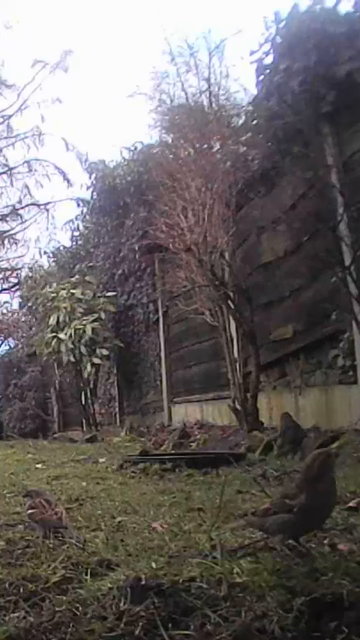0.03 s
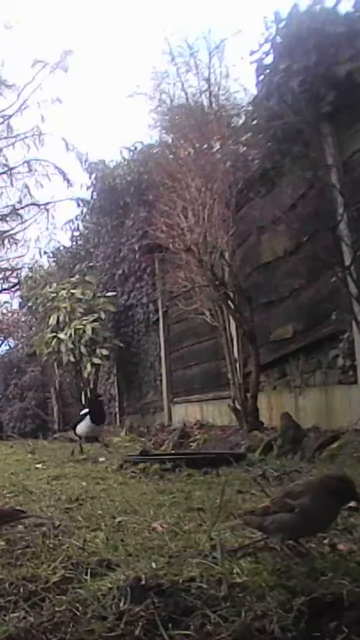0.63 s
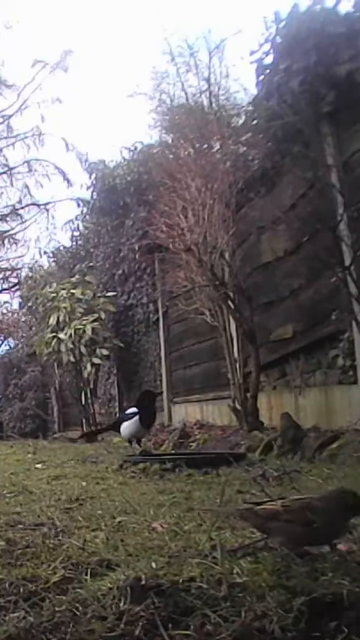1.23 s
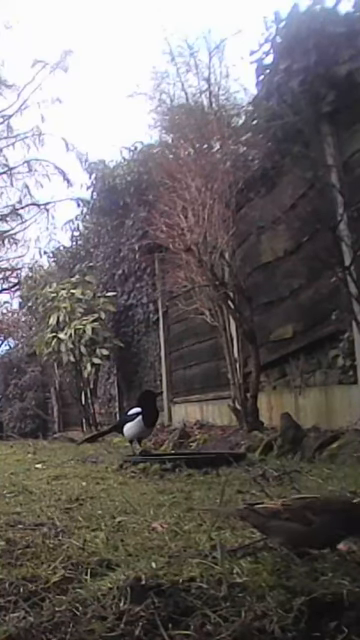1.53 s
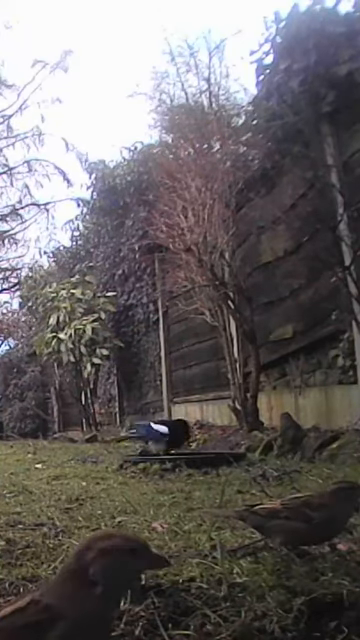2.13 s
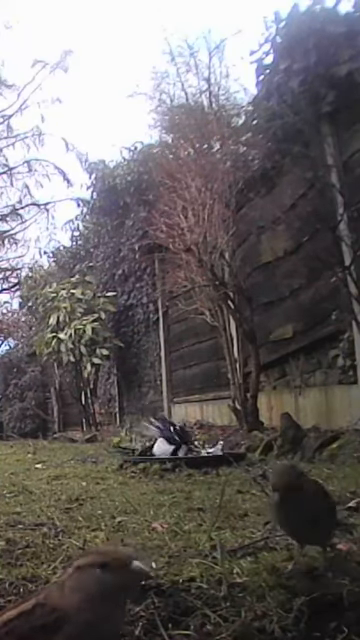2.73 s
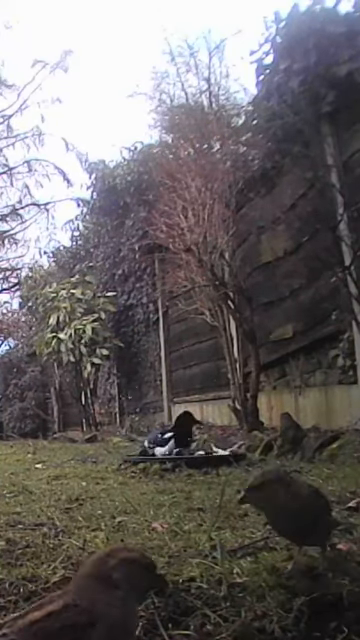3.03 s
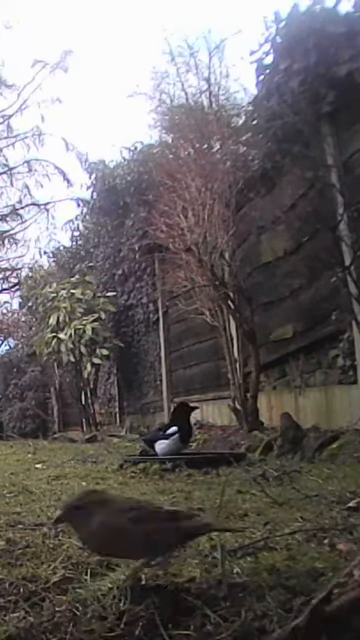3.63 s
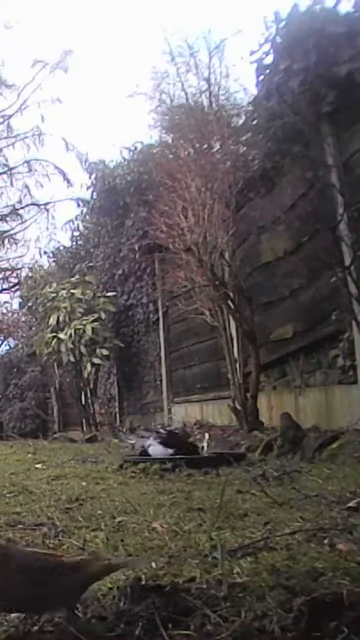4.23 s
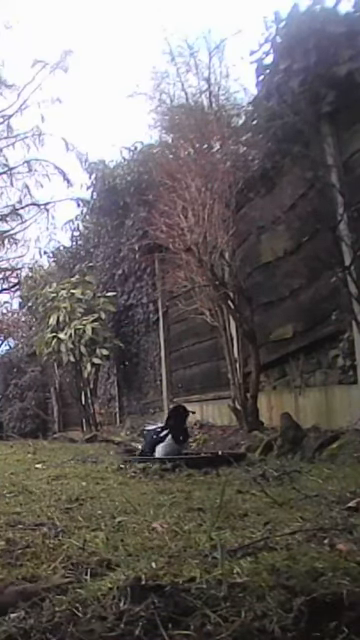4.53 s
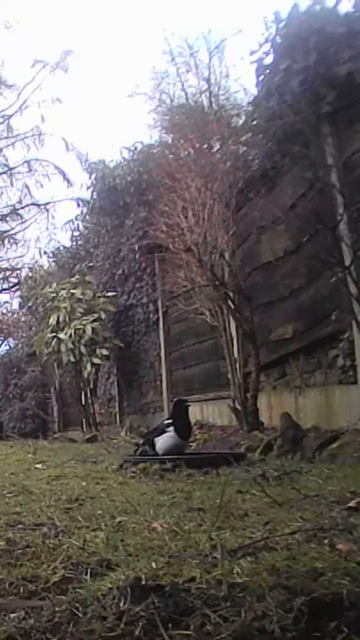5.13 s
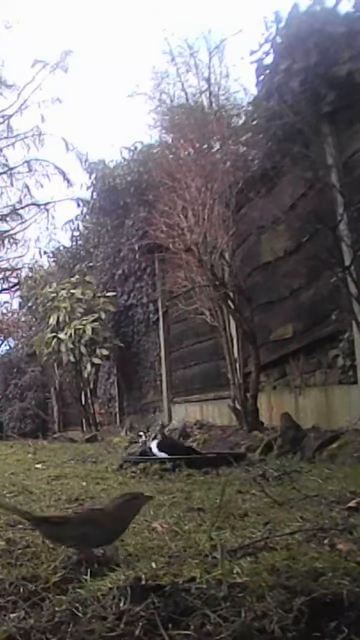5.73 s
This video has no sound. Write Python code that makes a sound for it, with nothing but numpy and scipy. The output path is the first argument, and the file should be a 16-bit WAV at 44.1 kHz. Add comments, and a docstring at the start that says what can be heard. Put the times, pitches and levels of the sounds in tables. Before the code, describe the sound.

A microphone low on a garden lawn picks up a deep, wavering drone of far traffic, along with its own hiss, slight whine and small clock-like tick. Everything else is faint: brief scratching from a sparrow in the grass, then light splashes and droplets as a magpie bathes further off. In the second half small birds give a falling whistle, a cluster of very high chirps and a raspy wheeze.

```python
"""Small birds give two thin high calls, a breathy falling whistle and a wheeze in a quiet garden.
Each call is a tone whose pitch shakes so fast that it buzzes. A sparrow scratches in the grass and
a magpie splashes in a dish: short puffs of noise, with tiny ringing drops among the splashes.
Behind them distant traffic rumbles and a far engine drones. The small camera on the lawn that hears
it all adds its own hiss, a faint whine and a tiny regular tick."""
import sys
import numpy as np
from scipy import signal
from scipy.fft import rfft, irfft
from scipy.io import wavfile

SR = 44100
rng = np.random.default_rng(int(sys.argv[2]) if len(sys.argv) > 2 else 0)


def unload_wav(signal):
    """Save mono or channel-first audio to the path in sys.argv[1] as 16-bit WAV at rate SR, clipped to [-1, 1]."""
    wavfile.write(
        sys.argv[1],
        SR,
        np.round(np.clip(np.atleast_2d(signal).T, -1, 1) * 32767).astype(np.int16),
    )


N = 254456

# puffs of noise; the last two blur the falling whistle, the others are water splashes:
# (time [s], level [dB], pitch [Hz], half length [s], pitch spread [natural log])
PUFFS = [(2.78, -74, 3400, .016, .2), (2.824, -73.5, 3570, .014, .06), (2.853, -77, 3600, .014, 0.073),
         (2.894, -72.5, 3600, .016, .2), (2.952, -69, 4000, .005, .35), (2.965, -65, 3700, 0.0075, 0.41),
         (2.992, -74, 2900, 0.0081, .25), (3.015, -73, 3700, 0.01, 0.3), (3.167, -75, 3120, .014, 0.28),
         (3.29, -79, 3500, 0.0071, .2), (4.22, -77, 3300, .1, 0.38), (4.415, -76, 3500, 0.03, 0.18)]


def amp(db):
    """Turns decibels into a number to multiply a sound by."""
    return 10 ** (np.asarray(db) / 20)


def unit(x):
    """Scales a signal so that its average size (rms) is 1."""
    return x / np.sqrt(np.mean(abs(x) ** 2) + 1e-30)


def curves(rows, t):
    """Joins a table's points with straight lines: one curve for each column after the time."""
    times, *columns = np.transpose(rows)
    return [np.interp(t, times, column) for column in columns]


def add(mix, start_s, sound):
    """Adds a sound to the mix at the given time."""
    part = mix[max(round(start_s * SR), 0):][:len(sound)]
    part += sound[:len(part)]


def noise(points):
    """Noise of average size 1, its tone shaped by points of (frequency [Hz], relative level [dB])."""
    hz, db = np.transpose(points)
    freqs = np.fft.rfftfreq(N, 1 / SR)
    shape = amp(np.interp(np.log(freqs + 1), np.log(hz + 1), db, left=-120, right=-120))
    return unit(irfft(rfft(rng.standard_normal(N)) * shape, N))


def drift(rate_hz):
    """A smooth random wobble of average size 1, no faster than about rate_hz."""
    freqs = np.fft.rfftfreq(2 ** 18, 1 / SR)
    spectrum = rfft(rng.standard_normal(2 ** 18))
    return unit(irfft(spectrum * np.exp(-(freqs / rate_hz) ** 2))[:N])


def puffs(rows):
    """Short, soft puffs of noise, each around one pitch."""
    out = np.zeros(N)
    for middle_s, db, hz, half_length_s, spread in rows:
        n = int(2 * half_length_s * SR)
        freqs = np.fft.rfftfreq(n, 1 / SR)
        band = np.exp(-.5 * (np.log((freqs + 1) / hz) / spread) ** 2)
        rustle = unit(irfft(rfft(rng.standard_normal(n)) * band, n))
        add(out, middle_s - half_length_s, amp(db) * rustle * np.hanning(n))
    return out


def camera(t, hiss_db=-71.5, tick_hz=5550, tick_rise_s=.0012):
    """The camera's own sounds: microphone hiss, a thin electrical whine and a small ringing tick."""
    # tone of the hiss: (frequency [Hz], relative level [dB])
    hiss_shape = [(880, -23.5), (1500, -2.5), (2010, -2), (2180, -2.5), (2240, -2.5), (3320, -3),
                  (3590, -3.5), (4610, -4), (5470, -4), (5920, -3.5), (6930, -5), (7770, -11),
                  (8290, -13.5), (10800, -47.5), (18200, -120)]
    # steady tones in the whine: (pitch [Hz], width [Hz], level [dB])
    whine_tones = [(582, 14.5, -80.5), (660, 22, -81.5), (702, 1, -76.3), (727, 8, -79.2), (751, 12, -84),
                   (1318, 45, -84), (1865, 31, -92), (2105, 1.2, -90.5), (2131, 2, -91.5), (2832, 1, -93.5),
                   (3298, 3, -95), (3465, 16, -92), (3510, 2, -93.5), (3535, 1.5, -92), (3656, 3, -95),
                   (5078, 35, -89), (5337, 28, -85.3), (5615, 31, -86.5), (5641, 2.5, -87)]
    # ticks, almost as regular as a clock: (time [s], level [dB])
    ticks = [(.406, -65), (1.052, -62), (1.713, -63.5), (2.394, -64), (3.044, -62), (3.706, -62),
             (4.370, -66), (5.028, -64), (5.676, -65)]
    out = amp(hiss_db) * noise(hiss_shape)
    for hz, width_hz, db in whine_tones:
        # small random steps blur each tone over its width
        wander = np.cumsum(rng.standard_normal(N)) * np.sqrt(2 * np.pi * width_hz / SR)
        out += amp(db) * np.sqrt(2) * np.sin(2 * np.pi * hz * t + wander)
    age = t[:SR // 10]
    ring = age / tick_rise_s * np.exp(1 - age / tick_rise_s) * np.sin(2 * np.pi * tick_hz * age)
    for peak_s, db in ticks:
        add(out, peak_s - tick_rise_s, amp(db) * ring)
    return out


def traffic(t, deep_db=-45.5, swell_db=.48, flutter_db=1.06):
    """Many far vehicles make a low rumble and their tyres a dull roar, wavering in the air."""
    # tone of the rumble, the deepest rumble and the tyres: (frequency [Hz], relative level [dB])
    rumble_shape = [(40, -28), (56, -4), (65, -7.5), (72, -6), (82, -12), (92, -7), (104, -7.5), (130, -15),
                    (141, -13), (165, -20.5), (190, -22), (203, -22), (238, -22), (260, -27.5), (305, -29),
                    (345, -35.5), (420, -44), (600, -68)]
    deep_shape = [(4.7, -30.5), (8.0, -2), (23, -2), (34, -1), (65, -15.5), (84, -46.5), (140, -120)]
    roar_shape = [(220, -38.5), (380, -6.5), (523, -8), (571, -6.5), (620, -6), (716, -3.5), (786, -4),
                  (897, -7), (1130, -7.5), (1195, -11), (1260, -8), (1340, -7.5), (1470, -15), (1700, -21),
                  (2210, -47), (3740, -120)]
    # traffic comes and goes: (time [s], rumble level [dB], tyre roar level [dB])
    levels = [(0.15, -51, -69.5), (.7, -50, -70.5), (1.2, -52, -69.5), (1.8, -51, -69.5),
              (2.4, -50.5, -69.5), (3.4, -51.5, -69.5), (4.1, -52, -69), (4.7, -51.5, -69.5),
              (5.35, -52, -70.5), (5.65, -51, -70)]
    rumble_db, roar_db = curves(levels, t)
    rumble = noise(rumble_shape) * amp(rumble_db + swell_db * drift(3.2))
    roar = noise(roar_shape) * amp(roar_db + flutter_db * drift(21))
    return amp(deep_db) * noise(deep_shape) + rumble + roar


def drone(pitch_hz=51.4, db=-50, wander_hz=2.688, waver_db=3.5):
    """A weak, low hum in the traffic; its pitch wanders, so it throbs against the engine."""
    hz = pitch_hz + wander_hz * drift(2.38)
    loudness = amp(db + waver_db * np.tanh(drift(13)))
    return np.sqrt(2) * loudness * np.sin(2 * np.pi * np.cumsum(hz) / SR)


def engine(t, firing_hz=46.14, waver_db=4, half_waver_db=4.5, jitter_cycles=.0099, shudder=.25):
    """A far engine hums unevenly at its firing rate and at half of it; the rest is lost on the way."""
    # the hum swells and fades unevenly: (time [s], firing tone level [dB], half-rate tone level [dB])
    levels = [(0.05, -43, -51), (.75, -44.5, -47), (1.25, -50, -46), (1.7, -44, -48.5), (2.15, -39, -51),
              (2.8, -41.5, -44.5), (3.3, -42.5, -46), (3.7, -40, -37.5), (4.3, -40.5, -41),
              (5.0, -43.5, -46), (5.35, -38, -52), (5.6, -40.5, -46.5), (5.73, -54.5, -40.5)]
    firing_db, half_db = curves(levels, t)
    phase = 2 * np.pi * (firing_hz * t + jitter_cycles * drift(6.1))
    firing_loudness = amp(firing_db + waver_db * np.tanh(drift(16)))
    firing_tone = np.sin(phase) + shudder * drift(16) * np.cos(phase)
    half_loudness = amp(half_db + half_waver_db * np.tanh(drift(14)))
    return np.sqrt(2) * (firing_loudness * firing_tone + half_loudness * np.sin(phase / 2))


def sparrow_scratches(pitch_hz=2450, spread=.21):
    """A sparrow makes a few quick, dry scrapes in the grass."""
    # scrapes: (time [s], level [dB], half length [s])
    scrapes = [(2.182, -71.5, 0.015), (2.21, -75, .02), (2.243, -71, .018), (2.269, -73, .011),
               (2.319, -74, .018)]
    return puffs([(time_s, db, pitch_hz, half_s, spread) for time_s, db, half_s in scrapes])


def spray(t, drops_per_s=300, low_hz=2040, high_hz=5400, pitches=16, ring_cycles=6, size_db=3):
    """Fine drops patter back into the dish, each ringing for a few cycles at its own pitch."""
    # spray falls between the splashes: (time [s], level [dB])
    levels = [(2.55, -100), (2.72, -84), (2.86, -82), (3.0, -81.5), (3.2, -86), (3.45, -100)]
    out, age = np.zeros(N), t[:SR // 50]
    for hz in np.geomspace(low_hz, high_hz, pitches):
        landings = rng.random(N) < drops_per_s / pitches / SR
        sizes = amp(size_db * np.minimum(rng.exponential(1, N), 3))
        ring = np.sin(2 * np.pi * hz * age) * np.exp(-2 * hz * age / ring_cycles)
        out += signal.oaconvolve(landings * sizes, ring)[:N]  # one ring for each landing
    return unit(out) * amp(curves(levels, t)[0])


def magpie_splashes():
    """A magpie bathes at the far end of the lawn, its wings throwing up water."""
    return puffs(PUFFS[:-2])


def whistle_blur():
    """A soft, breathy blur around the small bird's falling whistle."""
    return puffs(PUFFS[-2:])


def garden_echo(sound, fade_s=.23, echo_db=3, echoes_per_s=2000):
    """Fence, wall and hedges scatter many small echoes, which fade by 60 dB in fade_s."""
    age = np.arange(SR // 2) / SR
    strengths = rng.standard_normal(len(age))
    arrivals = (rng.random(len(age)) < echoes_per_s / SR) * (age > .002)
    echoes = unit(strengths * arrivals * amp(-60 * age / fade_s)) / np.sqrt(len(age))
    tail = signal.fftconvolve(sound, echoes)[:N]
    return (sound + amp(echo_db) * tail) / np.hypot(1, amp(echo_db))  # keeps the overall level


def bird_wheeze(t, start_s=5.28, peak_s=5.615, peak_db=-68, fade_db_per_s=26):
    """A bird's raspy wheeze: the pitch swings widely and unevenly, lingering at both ends."""
    middle_hz, swing_hz, rasp_hz = 3495, 205, 75
    swings_per_s, flutter_db = 110, 2.5
    swing_rate = swings_per_s * (1 + .45 * drift(90))
    swing = np.sin(2 * np.pi * np.cumsum(swing_rate) / SR)
    pitch = middle_hz + swing_hz * swing + rasp_hz * drift(300)
    tone = np.sin(2 * np.pi * np.cumsum(pitch) / SR) * amp(flutter_db * drift(110))
    swell = np.clip((t - start_s) / (peak_s - start_s), 0, 1) ** .78
    return unit(tone) * swell * amp(peak_db - fade_db_per_s * np.maximum(t - peak_s, 0))


def bird_note(length_s, first_hz, last_hz, db, swing_hz, swings_per_s=200, flutter_db=2.5):
    """One sliding whistle that swells and fades; a fast, uneven swing in pitch makes it buzz."""
    rise_share, fall_share = .24, .61  # parts of the note's length
    n = int(length_s * SR)
    progress = np.linspace(0, 1, n)
    slide_hz = first_hz + (last_hz - first_hz) * progress ** .84  # moves fastest at the start
    swing_rate = swings_per_s * (1 + .35 * drift(110)[:n])
    swing = np.sin(2 * np.pi * np.cumsum(swing_rate) / SR)
    wavering_hz = slide_hz * (1 + .0033 * drift(220)[:n])
    pitch = wavering_hz + swing_hz * (swing + .41 * drift(88)[:n])
    tone = np.sin(2 * np.pi * np.cumsum(pitch) / SR) * amp(flutter_db * drift(90)[:n])
    swell = np.clip(np.minimum(progress / rise_share, (1 - progress) / fall_share), 0, 1)
    return amp(db) * unit(tone) * swell


def small_birds(t):
    """Small birds whistle their short notes, and a wheeze comes last."""
    # notes: (start [s], length [s], first pitch [Hz], last pitch [Hz], level [dB], pitch swing [Hz])
    notes = [(2.812, 0.032, 6970, 6870, -77.5, 80), (3.954, 0.14, 3860, 3590, -77, 140),
             (4.026, 0.26, 3430, 2970, -77.5, 200), (4.215, 0.056, 3050, 2950, -77, 110),
             (4.294, 0.11, 3130, 3020, -77.5, 110), (4.388, .09, 5070, 4950, -80, 161),
             (4.628, 0.033, 1485, 1420, -71.5, 45), (4.630, 0.075, 6890, 6850, -75.5, 75),
             (4.683, 0.17, 7120, 7500, -77, 280), (4.835, 0.04, 6980, 6870, -82, 80),
             (4.895, 0.065, 6940, 6820, -75, 84.6), (4.968, 0.026, 6960, 6960, -69, 95),
             (5.007, 0.022, 6920, 6860, -70, 96), (5.034, 0.022, 6920, 6880, -75, 95),
             (5.072, 0.049, 6940, 6820, -77.5, 75), (4.957, 0.15, 7600, 7340, -79, 250)]
    out = bird_wheeze(t)
    for start_s, *settings in notes:
        add(out, start_s, bird_note(*settings))
    return out


def scene():
    """Mixes the birds, the far traffic and the camera's own noise into one channel."""
    t = np.arange(N) / SR
    calls = small_birds(t)
    road = traffic(t) + engine(t) + drone()
    birds = garden_echo(calls) + magpie_splashes() + whistle_blur() + spray(t) + sparrow_scratches()
    return (road + birds + camera(t))[None]


def record(dry, start_s=.035, offset=-.0195, cutoff_hz=8100):
    """The sound starts abruptly, settles a little off zero and fades at the very end; top treble is cut."""
    t = np.arange(N) / SR
    onset = np.clip((t - start_s) / .001, 0, 1)
    settling = np.clip(.5 + (t - start_s) / .03, 0, 1)
    fade_out = np.sin(np.pi / 2 * np.clip((t[-1] - t) / .016, 0, 1)) ** 2
    lowpass = signal.firwin(401, cutoff_hz, window=("kaiser", 9), fs=SR)
    return signal.oaconvolve((dry + offset * settling) * onset * fade_out, lowpass[None], "same")


dry = scene()
out = record(dry)
unload_wav(out)
```